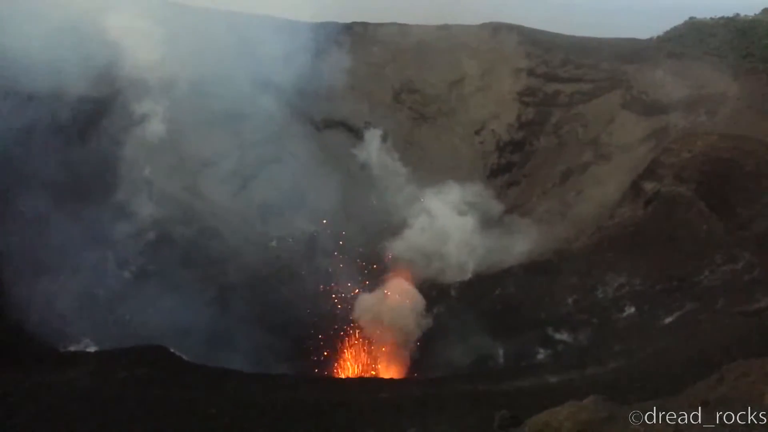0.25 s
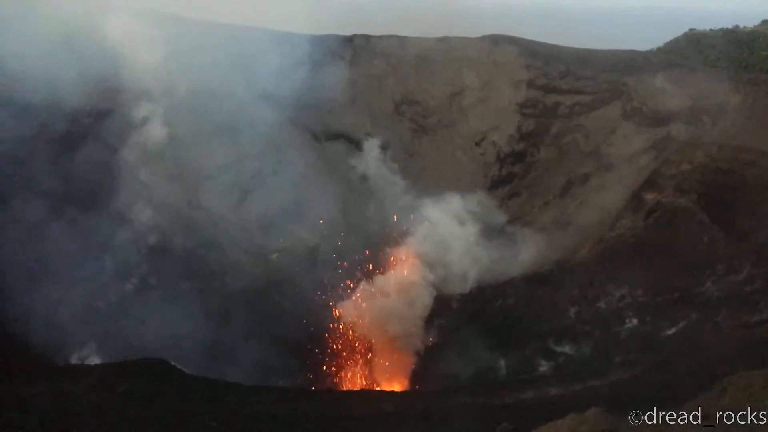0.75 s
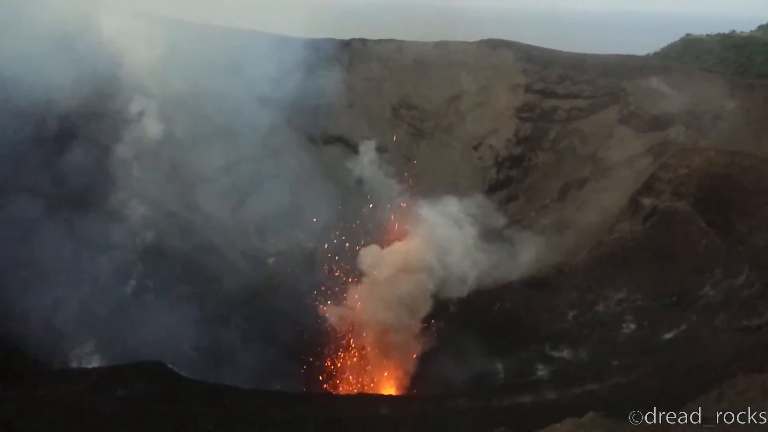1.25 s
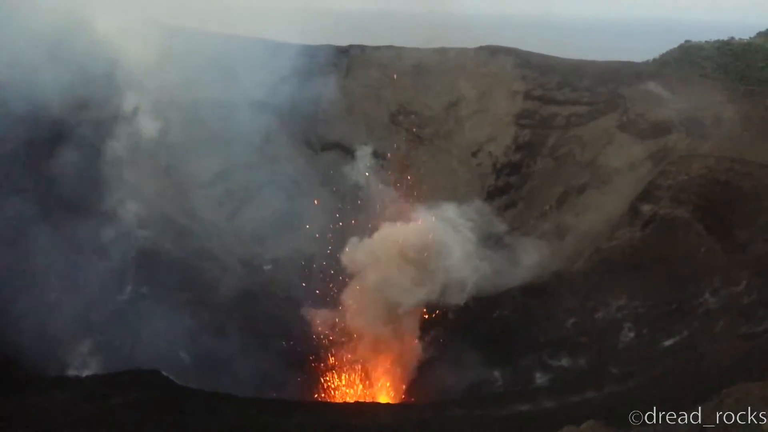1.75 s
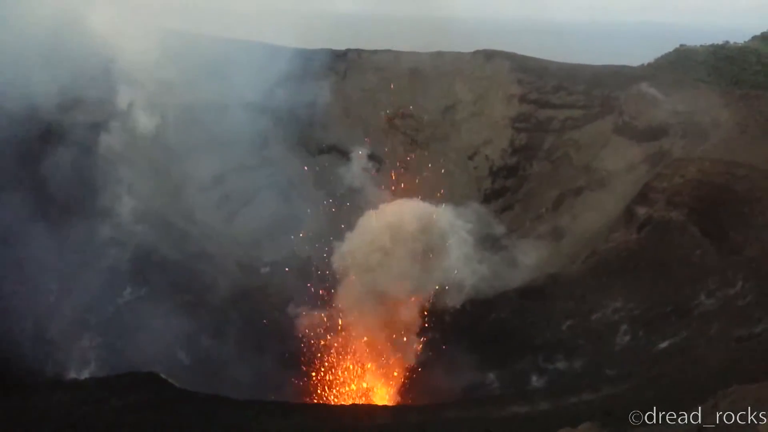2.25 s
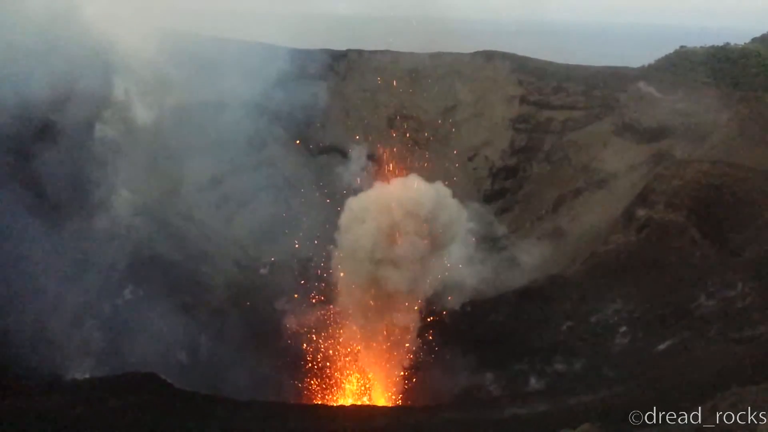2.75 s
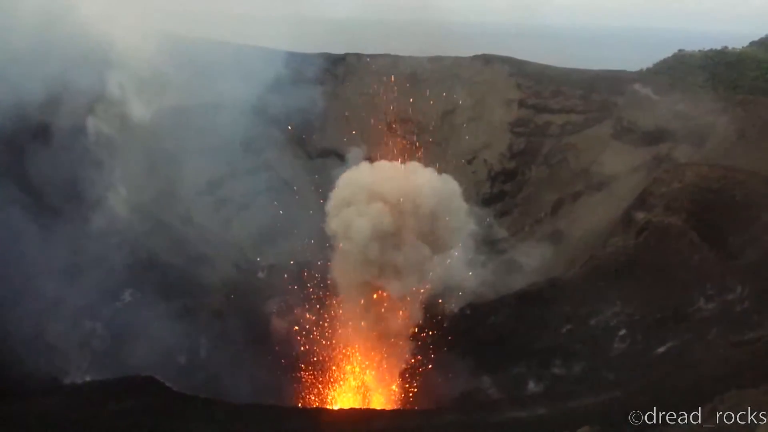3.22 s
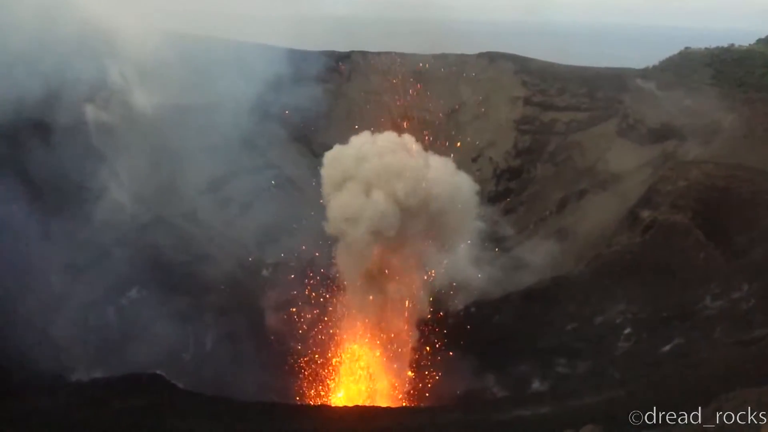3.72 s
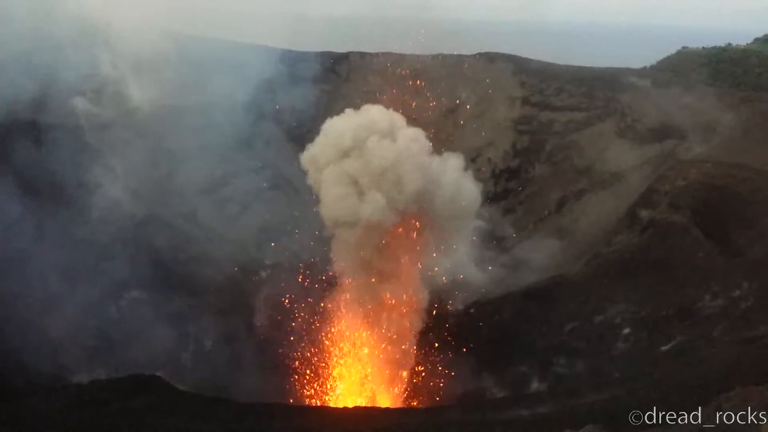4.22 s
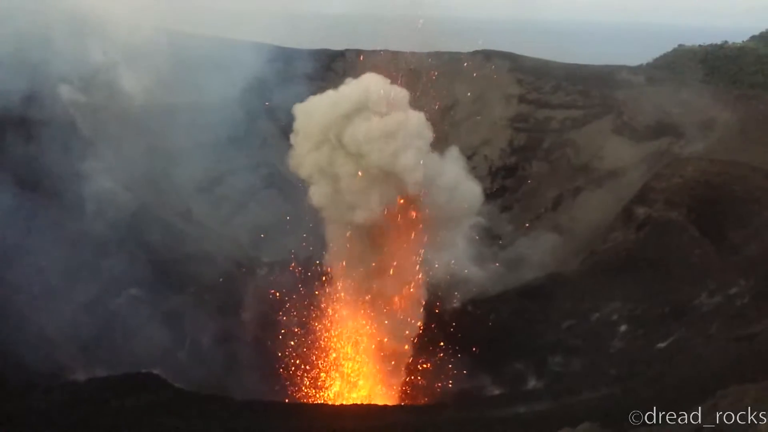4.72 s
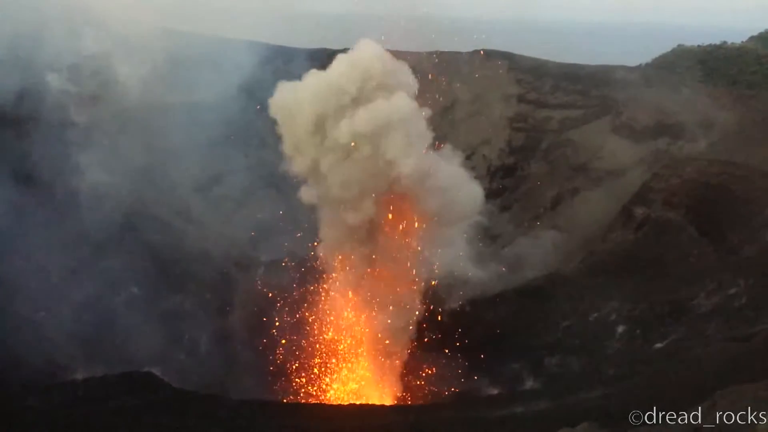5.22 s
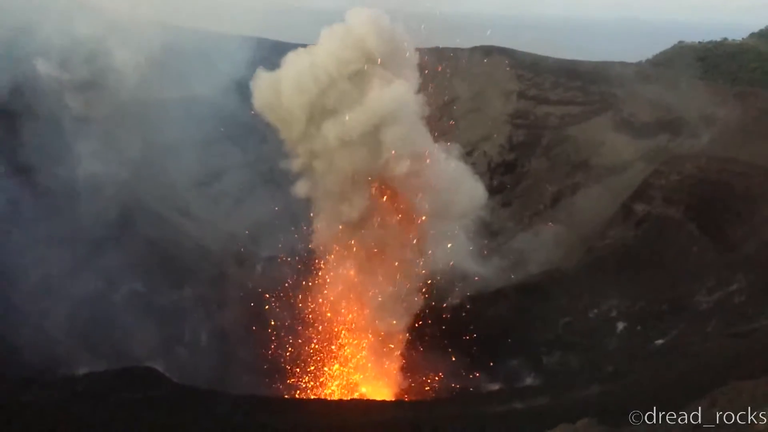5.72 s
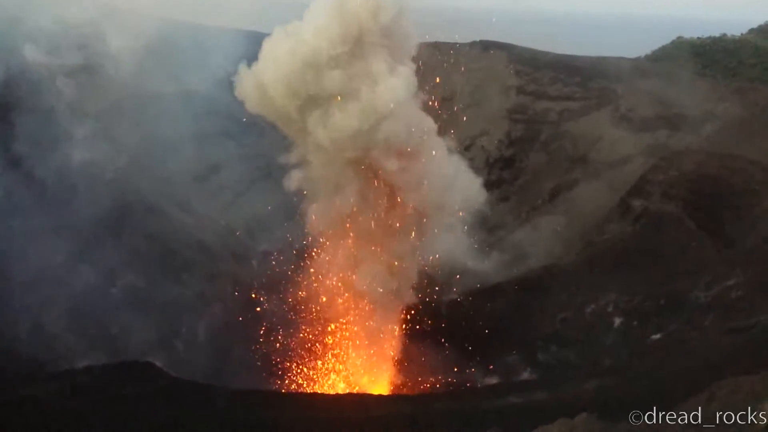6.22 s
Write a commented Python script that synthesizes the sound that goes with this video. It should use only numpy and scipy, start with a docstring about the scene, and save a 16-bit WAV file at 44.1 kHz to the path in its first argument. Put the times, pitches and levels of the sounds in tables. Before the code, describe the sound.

An erupting volcano heard outdoors from the crater rim, almost entirely in the left channel, the right very faint. It opens with a low rumble, a thin high steam leak, dull ticks and wind thumping the microphone. At about 0.2 s the vent opens abruptly, and hard buffets continue until 0.5 s as the jet builds to a loud, continuous roar by 0.7 s. Deep bass turbulence underlies a rough, crackling mid-range rush and finer hiss; rounded low billows swell through it, with irregular wind gusts. The rush strengthens to its peak around 2.9-3.4 s, with a dry tick at 3.2 s, sinks near 4 s, surges again around 4.6 s, then gradually eases. From 5.7 to 5.9 s come thumps and brief pitched clacks, with another clack near 6.3 s. The hiss slackens and a final cluster of heavy thumps lands around 6.2-6.4 s, the roar still going.

```python
"""A low rumble, a thin steam leak and wind thumping on the microphone come first; then a volcanic vent
opens abruptly and keeps jetting gas and ash, heard from the crater rim.
Large eddies roar, smaller ones rush and crackle, fast gas hisses, billows swell and short clacks ring.
The continuous sounds are noise given a spectrum and a changing level; the thumps, ticks and clacks are
single pulses or short rings. The right channel is far weaker than the left."""
import sys
import numpy as np
from scipy import signal
from scipy.fft import rfft, irfft, next_fast_len
from scipy.io import wavfile
from scipy.ndimage import uniform_filter1d, minimum_filter1d

SR = 44100
rng = np.random.default_rng(int(sys.argv[2]) if len(sys.argv) > 2 else 0)


def dump(signal):
    """Clip the signal to [-1, 1] and save it as 16-bit WAV at the path in sys.argv[1]."""
    limited = np.clip(np.atleast_2d(signal).T, -1, 1)
    pcm = np.round(limited * 32767).astype(np.int16)
    wavfile.write(sys.argv[1], SR, pcm)


N = 285591  # length [samples]


def from_db(db):
    """Turn decibels into a gain."""
    return 10 ** (np.asarray(db) / 20)


def rms_one(x):
    """Scale a sound to an rms (average strength) of 1."""
    return x / np.sqrt(np.mean(x ** 2) + 1e-20)


def seconds():
    """Time of every sample."""
    return np.arange(N) / SR


def level_curve(rows):
    """Join the (time, level) points of a table by straight lines, at every sample."""
    times, levels = np.transpose(rows)
    return np.interp(seconds(), times, levels)


def swell(s, half_length):
    """A bell-shaped rise and fall of height 1 around time s."""
    distance = (seconds() - s) / half_length
    return np.exp(-.5 * np.minimum(distance ** 2, 100))


def filtered(x, spectrum, dips=()):
    """Apply a smooth spectrum with bell-shaped dips."""
    size = next_fast_len(N, real=True)
    hz = np.maximum(np.arange(size // 2 + 1) * SR / size, 1)
    points, levels = np.transpose(spectrum)
    db = np.interp(np.log(hz), np.log(points), levels)
    for centre, width, depth in dips:
        db = db + depth * np.exp(-.5 * ((hz - centre) / width) ** 2)
    # fade out what lies below about 10 Hz
    low_cut = hz ** 2 / (hz ** 2 + 10 ** 2)
    return irfft(rfft(x, size) * from_db(db) * low_cut, size)[:N]


def coloured(x, spectrum, dips=()):
    """Give a raw noise its spectrum, at an rms of 1."""
    return rms_one(filtered(x, spectrum, dips))


def sustained(x, size):
    """Hold the power of a noise steady over stretches of `size` samples."""
    return x / np.sqrt(uniform_filter1d(x ** 2, size) + 1e-9)


def drift(rate):
    """Slow random wandering that changes about `rate` times a second; spread 1."""
    step = 40  # samples between the drawn points
    r = np.exp(-2 * np.pi * rate * step / SR)
    draws = rng.standard_normal(N // step + 2002)
    slow = signal.lfilter([1], [1, -2 * r, r * r], draws)[2000:]  # skip the filter's start
    return np.interp(np.arange(N) / step, np.arange(len(slow)), rms_one(slow))


# Tone of the low rumble in the crater: (frequency [Hz], relative level per Hz [dB])
RUMBLE_SPECTRUM = [(20, -7), (75, 4), (150, -9.5), (310, -20.5), (450, -24), (1000, -38.5), (1600, -35.5),
                   (3000, -40), (8000, -81)]
# Tone of the steam leak: (frequency [Hz], relative level per Hz [dB])
STEAM_SPECTRUM = [(2500, -40.5), (3350, -18), (3650, -1.5), (4050, 1), (4450, -5), (4750, -13), (6000, -20),
                  (8000, -36.5), (14000, -47)]


def crater(rumble_db, steam_db):
    """The low rumble and the thin hiss of leaking steam are two noises that go on all the time."""
    rumble, steam = rng.standard_normal((2, N))
    rumble = sustained(coloured(rumble, RUMBLE_SPECTRUM), size=3000)
    steam = coloured(steam, STEAM_SPECTRUM)
    return from_db(rumble_db) * rumble + from_db(steam_db) * steam


# Tone of the wind at the microphone: (frequency [Hz], relative level per Hz [dB])
WIND_SPECTRUM = [(15, -17.5), (40, 0), (70, 8), (120, 4), (200, -14), (340, -18.5), (500, -23),
                 (800, -26.5), (1500, -42), (3000, -73), (8000, -83.5)]
# Gusts, before the random lumps: (time [s], half length [s], level [dB])
GUSTS = [(0.043, 0.04, -17.5), (0.25, 0.056, -19.5), (0.657, 0.03, -12.5), (.92, 0.053, -19),
         (1.343, 0.044, -17), (1.602, 0.064, -24), (1.907, 0.079, -15), (2.225, 0.12, -20),
         (2.792, 0.034, -19), (4.623, 0.055, -25), (4.885, 0.03, -20), (5.34, 0.099, -18.5),
         (5.6, 0.085, -23.5), (5.795, 0.07, -25), (6.4, 0.11, -39)]
BREEZE_DB = -46  # wind between the gusts, before the lumps


def wind(lumpy_db):
    """Wind pushing on the microphone is lumpy low noise that swells with each gust."""
    force = from_db(BREEZE_DB)
    for s, half_length, db in GUSTS:
        force = force + from_db(db) * swell(s, half_length)
    lumps = from_db(lumpy_db * drift(32))
    rumbling = sustained(coloured(rng.standard_normal(N), WIND_SPECTRUM), size=900)
    return lumps * force * rumbling


# Dry ticks: (time [s], peak level [dB], top edge [Hz])
TICKS = [(.017, -16, 1150), (.072, -13, 1420), (3.226, -25, 12000), (6.338, -17, 1500)]


def ticks():
    """Each tick is one pulse with its treble removed; a lower top edge makes it duller."""
    out = np.zeros(N)
    for s, db, edge_hz in TICKS:
        click = (np.arange(N) == round(s * SR)) + 1e-18  # the tiny offset keeps the filter quick
        low_pass = signal.butter(4, edge_hz, fs=SR, output="sos")
        pulse = signal.sosfilt(low_pass, click)
        out += from_db(db) * pulse / pulse.max()
    return out


# Single eddies that hit the microphone:
# (time [s], thump peak level [dB], half width of the push [s], swirl level [dB])
BUFFETS = [(0.0187, -6.5, 0.0011, -21.5), (.054, -9, 0.0015, -36), (0.081, -7, 0.0015, -26),
           (0.2111, -3, .0014, -30), (0.228, -13, 0.0029, -39), (.2555, -5, .0016, -39),
           (.269, -9, 0.0014, -28), (0.341, -8, 0.0016, -22.5), (0.357, -18, 0.0024, -22),
           (0.427, -1, 0.0011, -22), (.499, -7.5, 0.00048, -19.5), (5.677, -12, 0.001, -23),
           (5.88, -2, 0.0021, -20), (6.227, -10, 0.0015, -27), (6.339, -11, 0.0007, -22),
           (6.358, -1.5, 0.0014, -37), (6.412, -5, 0.0016, -36), (6.423, -11, 0.0013, -27),
           (6.436, -6, .0013, -21)]
SWIRL_HALF_LENGTH_S, SWIRL_LOW_HZ, SWIRL_TOP_HZ = 0.0095, 179, 593


def buffets():
    """An eddy hitting the microphone is one rounded pressure thump inside a short, rough swirl."""
    out = np.zeros(N)
    band = signal.butter(3, [SWIRL_LOW_HZ, SWIRL_TOP_HZ], "band", fs=SR, output="sos")
    swirl = sustained(signal.sosfilt(band, rng.standard_normal(N)), size=400)
    for s, db, half_width, swirl_db in BUFFETS:
        distance = (seconds() - s) / half_width
        thump = (distance ** 2 - 1) * swell(s, half_width)
        out += from_db(db) * thump
        out += from_db(swirl_db) * swirl * swell(s, SWIRL_HALF_LENGTH_S)
    return out


# Level of the large eddies, before the roar's overall gain: (time [s], level [dB])
ROAR_LEVEL = [(.22, -23), (.5, -20), (.79, -18), (2.3, -19), (2.65, -19), (3.1, -18), (3.45, -19.5),
              (4.1, -22.5), (4.4, -20), (4.7, -17), (5.35, -20.5), (6.05, -22.5), (6.48, -22.5)]
# Tone of the large eddies: (frequency [Hz], relative level per Hz [dB])
ROAR_SPECTRUM = [(15, -37.5), (28, -17.5), (45, -10), (62, -0.5), (82, -3), (120, 3.5), (210, -1),
                 (330, -7), (420, -14.5), (600, -38.5), (1200, -92)]


def roar(strength, gain_db, bass_hz, thinning):
    """Large eddies make a deep noise; the faster the jet, the less of it lies in the deepest bass."""
    eddies = coloured(rng.standard_normal(N), ROAR_SPECTRUM)
    low_pass = signal.butter(2, bass_hz, fs=SR, output="sos")
    bass = signal.sosfiltfilt(low_pass, eddies)
    speed_db = np.clip(strength - np.median(strength), -4, 4)
    # swap the bass for a weaker or stronger copy
    eddies = eddies + (from_db(-thinning * speed_db) - 1) * bass
    return from_db(level_curve(ROAR_LEVEL) + gain_db) * sustained(eddies, size=3000)


# Brief swells and dips of the hiss and the rush; a negative change is a dip:
# (time [s], half length [s], change of the hiss [dB], change of the rush [dB])
SWELLS_AND_DIPS = [(0.312, 0.018, 9, 1.5), (0.382, 0.025, 11.5, 0), (0.465, 0.042, 6.5, 1.5),
                   (.735, 0.018, 0, 1), (1.145, 0.027, 6.5, 1), (1.207, 0.03, 4.5, 3),
                   (1.975, 0.019, 1.5, 2), (2.338, 0.019, 6.5, 1.5), (2.378, 0.023, 8, 2),
                   (2.579, 0.021, 2.5, 4), (3.097, 0.087, 3, 5.5), (3.15, 0.29, -1, -4.5),
                   (3.243, 0.019, 0, 3), (4.374, 0.026, 1.5, 1.5), (5.782, 0.053, 5.5, 1),
                   (6.047, 0.062, 1.5, -0.5)]


def swells_and_dips():
    """The hiss and the rush briefly swell or dip in bell shapes; returns both changes in dB."""
    hiss_change, rush_change = np.zeros((2, N))
    for s, half_length, hiss_db, rush_db in SWELLS_AND_DIPS:
        shape = swell(s, half_length)
        hiss_change += hiss_db * shape
        rush_change += rush_db * shape
    return hiss_change, rush_change


def shocks(per_s, spread_db):
    """Steep pressure fronts arrive at random; a negative spread makes most near full size, some weaker."""
    sizes = from_db(spread_db * np.minimum(rng.exponential(1, N), 4))
    return rms_one(sizes * (rng.random(N) < per_s / SR))


# Tone of the smaller eddies: (frequency [Hz], relative level per Hz [dB])
RUSH_SPECTRUM = [(250, -33.5), (480, -8.5), (660, 0.5), (820, -1), (1100, -6), (1650, -7.5), (2100, -10.5),
                 (3200, -16), (6000, -87)]
# Bands cancelled by reflections off the ground at the rim: (centre [Hz], width [Hz], depth [dB])
GROUND_DIPS = [(504, 87, -6.5), (1339, 85, -6), (1964, 121, -6.5), (2450, 80, -3), (3077, 136, -4.5),
               (3747, 79, -8.5), (4250, 190, -5)]


def rush(level_db, crackle):
    """Smaller eddies rush: noise and crackling shocks share one spectrum."""
    small = rng.standard_normal(N)
    eddies = coloured(small + crackle, RUSH_SPECTRUM, GROUND_DIPS)
    return from_db(level_db) * sustained(eddies, size=5000)


# Tone of the fast gas: (frequency [Hz], relative level per Hz [dB])
HISS_SPECTRUM = [(900, -19.5), (1700, 4.5), (2250, -3.5), (2800, -0.5), (4300, 4.5), (4800, 3), (5300, 2.5),
                 (6000, -7.5), (7000, -17.5), (8000, -30), (9200, -58.5), (14000, -66)]
# the hiss follows the jet: dB per dB of strength, about a typical strength in dB
HISS_FOLLOWS, TYPICAL_STRENGTH_DB = 0.88, -31
BRIGHTENING_DB_PER_S = 0.02  # the hiss slowly grows against the rush
# near the end the fast gas slackens and the hiss loses level
SLACK_START_S, SLACK_TAKES_S, SLACK_DB = 6.27, 0.06, 2.7
SPUTTER_DB, SPUTTERS_PER_S = 1.16, 9.9  # the hiss wavers at random


def hiss(strength, level_db, crackle):
    """Fast gas hisses: fine noise with some crackle follows the jet's strength and wavers."""
    slack = np.clip((seconds() - SLACK_START_S) / SLACK_TAKES_S, 0, 1)
    level_db = level_db + HISS_FOLLOWS * (strength - TYPICAL_STRENGTH_DB)
    level_db = level_db + BRIGHTENING_DB_PER_S * seconds() - SLACK_DB * slack
    level_db = level_db + SPUTTER_DB * drift(SPUTTERS_PER_S)
    fine = rng.standard_normal(N)
    return from_db(level_db) * coloured(fine + 0.27 * crackle, HISS_SPECTRUM, GROUND_DIPS)


# Strength of the jet as it builds, peaks, wanes and swells again; also the rush level
# before brief changes, flutter and overall gain: (time [s], level [dB])
JET_STRENGTH = [(.22, -41), (.36, -37.5), (.73, -32), (1.0, -31.5), (1.4, -32.7), (1.85, -32), (2.28, -31),
                (2.85, -27), (3.15, -27), (3.4, -27), (3.78, -30), (3.98, -34.5), (4.28, -33.5),
                (4.55, -29), (4.85, -31.5), (5.45, -33.5), (6.27, -34), (6.42, -38)]
BLAST_S, BLAST_RISE_S = 0.18, 0.056  # the vent starts to open, and how long it takes


def jet(roar_db, rush_db, hiss_db, crackle_db, flutter_db, bass_hz, thinning):
    """Turbulence at three scales; the rush and the hiss share the jet's strength, shocks and flutter."""
    strength = level_curve(JET_STRENGTH)
    hiss_change, rush_change = swells_and_dips()
    crackle = from_db(crackle_db) * shocks(per_s=600, spread_db=-1.5)
    flutter = flutter_db * drift(37)
    deep = roar(strength, roar_db, bass_hz, thinning)
    middle = rush(strength + rush_change + rush_db + flutter, crackle)
    high = hiss(strength, hiss_change + hiss_db + .5 * flutter, crackle)
    opening = np.clip((seconds() - BLAST_S) / BLAST_RISE_S, 0, 1)
    return opening * (deep + middle + high)


# Billows of gas rolling out of the vent: (time [s], half length [s], level [dB])
BILLOWS = [(0.855, 0.073, -28), (1.06, 0.074, -19), (1.634, 0.078, -19), (1.874, 0.029, -18),
           (2.16, 0.043, -21), (2.35, 0.057, -24.5), (2.547, 0.037, -20.5), (2.756, 0.061, -22.5),
           (3.0, 0.089, -19.5), (3.36, 0.2, -21), (4.387, 0.043, -21), (4.728, 0.031, -21),
           (5.18, 0.069, -18), (5.8, 0.077, -25.5), (6.253, 0.036, -16.5), (6.432, 0.024, -24)]
# Tone of the billows: (frequency [Hz], relative level per Hz [dB])
BILLOW_SPECTRUM = [(110, -35), (210, 10), (280, 10), (360, 6.5), (450, -8.5), (700, -75)]


def billows():
    """Each billow of gas is a rounded swell of noise in the upper part of the roar."""
    force = np.zeros(N)
    for s, half_length, db in BILLOWS:
        force += from_db(db) * swell(s, half_length)
    return force * sustained(coloured(rng.standard_normal(N), BILLOW_SPECTRUM), size=2000)


# Brief pitched clacks: (time [s], level before the fade [dB], ring pitch [Hz])
CLACKS = [(5.675, -15.5, 1660), (5.679, -16, 885), (5.777, -18, 2770), (5.831, -17.5, 2260),
          (6.283, -18, 1720)]
CLACK_RISE_S, CLACK_T60_S = .0008, .026  # T60 is the time to fade by 60 dB


def clacks():
    """A clack rings for a moment at one pitch: a sine that starts quickly and fades."""
    out = np.zeros(N)
    for s, db, hz in CLACKS:
        age = np.clip(seconds() - s, 0, .2)
        rise = np.minimum(age / CLACK_RISE_S, 1)
        fade = from_db(db - 60 * age / CLACK_T60_S)
        out += rise * fade * np.sin(2 * np.pi * hz * age)
    return out


# Filter that weakens the volcano in the right channel: (frequency [Hz], level [dB])
WEAK_SIDE = [(40, -25.5), (150, -37.5), (350, -30), (800, -32.5), (1300, -25.5), (1600, -36), (2300, -30.5),
             (3500, -37), (4300, -29.5), (5300, -43.5), (8000, -13)]


def weak_side(volcano):
    """The right channel gets the volcano plus scattered sound, a copy 31 ms late, both much weakened."""
    scattered = np.interp(seconds() - .031, seconds(), volcano, left=0)
    return filtered(0.91 * volcano + 0.8 * scattered, WEAK_SIDE)


def scene():
    """Both channels hear the volcano and the thumps; each has wind of its own, and the left has the ticks."""
    volcano = crater(rumble_db=-26.5, steam_db=-44.5)
    volcano = volcano + jet(roar_db=7.0, rush_db=7.0, hiss_db=-30.0, crackle_db=-7.0,
                            flutter_db=0.9, bass_hz=85, thinning=1.0)
    volcano = volcano + billows() + clacks()
    thumps = buffets()
    left = volcano + wind(lumpy_db=5.0) + thumps + ticks()
    right_wind = from_db(-25) * wind(lumpy_db=6.0)
    right = weak_side(volcano) + right_wind + from_db(-24.5) * thumps
    return np.array([left, right])


CEILING, CUTOFF_HZ = .95, 15000  # highest peak the limiter lets through; top edge of the sound


def record(dry):
    """A faint electronic hiss is added, a fast limiter holds the peaks and the top is cut."""
    noisy = dry + from_db(-73) * rng.standard_normal((2, N))
    needed = CEILING / np.maximum(np.abs(noisy), CEILING)
    # hold the lowest gain around each peak, then smooth it
    gain = uniform_filter1d(minimum_filter1d(needed, size=101), size=101)
    top_cut = signal.ellip(10, .1, 80, CUTOFF_HZ, fs=SR, output="sos")
    return signal.sosfilt(top_cut, gain * noisy)


dry = scene()
out = record(dry)
dump(out)
```